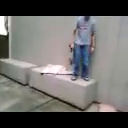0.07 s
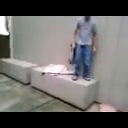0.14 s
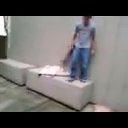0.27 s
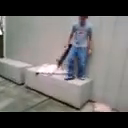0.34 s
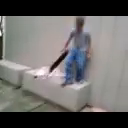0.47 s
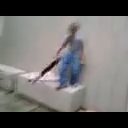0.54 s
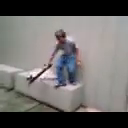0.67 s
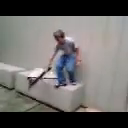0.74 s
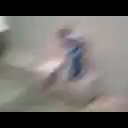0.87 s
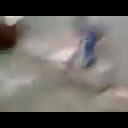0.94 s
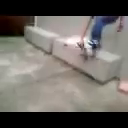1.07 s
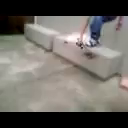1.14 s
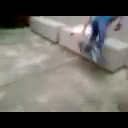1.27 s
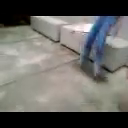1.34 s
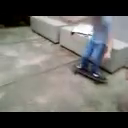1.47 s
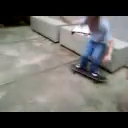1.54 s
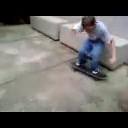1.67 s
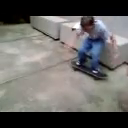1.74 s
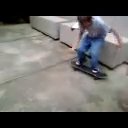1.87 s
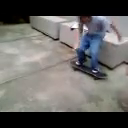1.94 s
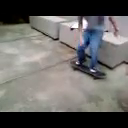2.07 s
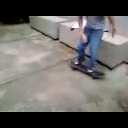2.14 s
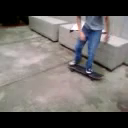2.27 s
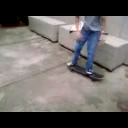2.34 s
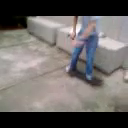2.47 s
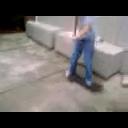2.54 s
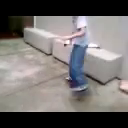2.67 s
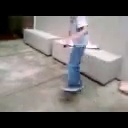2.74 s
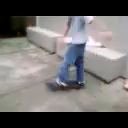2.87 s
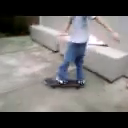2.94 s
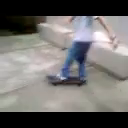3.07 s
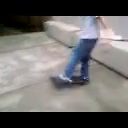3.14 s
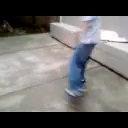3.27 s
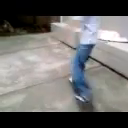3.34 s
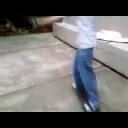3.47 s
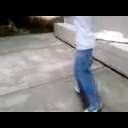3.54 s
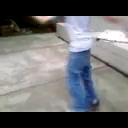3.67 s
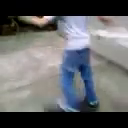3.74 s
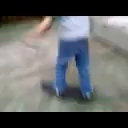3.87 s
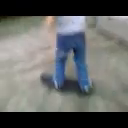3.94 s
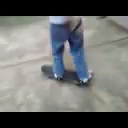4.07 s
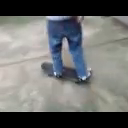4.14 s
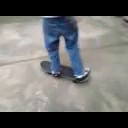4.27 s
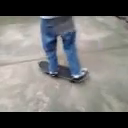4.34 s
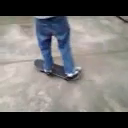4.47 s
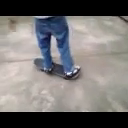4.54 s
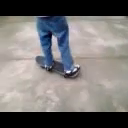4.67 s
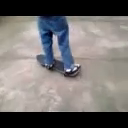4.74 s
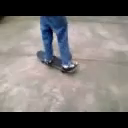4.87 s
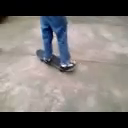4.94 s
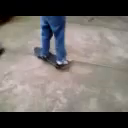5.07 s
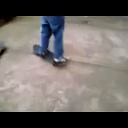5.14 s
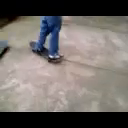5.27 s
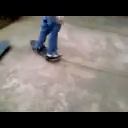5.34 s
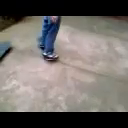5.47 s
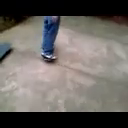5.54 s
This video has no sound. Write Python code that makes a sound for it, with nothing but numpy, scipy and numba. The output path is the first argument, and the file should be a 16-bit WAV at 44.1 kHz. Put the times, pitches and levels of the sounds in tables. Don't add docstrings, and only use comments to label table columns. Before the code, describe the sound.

In a walled concrete yard, a skateboard makes barely any noise at first, then lands with a loud, overloaded wooden and metallic crash. Wheels squeak sideways and the deck taps and rattles, before two separate hard clacks as the board slaps the ground. Faint rolling and scuffs follow. An old phone microphone gives narrow, gritty, clipped sound with short wall echoes.

```python
import sys
import numpy as np
from scipy import signal
from scipy.fft import rfft, irfft, next_fast_len
from scipy.io import wavfile
from scipy.ndimage import uniform_filter1d
from numba import njit

SR = 44100
rng = np.random.default_rng(int(sys.argv[2]) if len(sys.argv) > 2 else 0)


def magnitude_from_level(level_db):
    exponent = np.asarray(level_db, float) / 20
    return 10 ** exponent


def wav_record(signal):
    frames = np.transpose(np.atleast_2d(signal))
    bounded = np.clip(frames, -1, 1)
    quanta = np.round(bounded * 32767).astype(np.int16)
    wavfile.write(sys.argv[1], SR, quanta)


N = 247370

# [f/Hz, width/Hz, level/dB]
DECK = [(331, 180, 4), (424, 270, 1), (542.3, 180, -1), (661, 41, -1.5), (835, 33, -9.5)]
WHEELS = [(948, 280, -0.25), (1160, 160, -0.7), (1360, 160, 0.52), (1500, 74, -3.8), (1762, 480, -2.3)]
TRUCKS = [(2332, 340, -7), (2500, 210, -3.5), (2730, 300, -6.5), (3324, 660, -3), (3744, 580, -1.5)]
FREE_BOARD = (DECK, WHEELS, TRUCKS)
# [t/s of the crest, crest/full scale, struck part 0 deck 1 wheel 2 truck, ring f/Hz]
HARD_CLACKS = [
    (3.3172, .775, .4, 380),
    (4.2716, .9, .7, 550),
]
# [f/Hz, level/dB]
PHONE = [(20, 0), (120, -2), (250, -2), (3200, -1), (3600, -12.5), (3900, -18), (4250, -25.5),
         (4550, -48.5), (4900, -90.5)]


def to_rms(x, db):
    return x * magnitude_from_level(db) / np.sqrt(np.mean(x ** 2))


def ring(x, modes, scatter_db=np.zeros(5)):
    out = 0
    for k, (hz, width_hz, db) in enumerate(modes):
        r = np.exp(-np.pi * width_hz / SR)
        poles = [1, -2 * r * np.cos(2 * np.pi * hz / SR), r * r]
        mode = (1 - r) * signal.lfilter([1, 0, -1], poles, x)
        out = out + (-1) ** k * magnitude_from_level(db + scatter_db[k]) * mode
    return out


def colour(x, points):
    hz, db = np.transpose(points)
    size = next_fast_len(N + 8192)
    log_hz = np.log(np.fft.rfftfreq(size, 1 / SR) + 1)
    gain = magnitude_from_level(np.interp(log_hz, np.log(hz), db))
    return irfft(rfft(x, size) * gain, size)[..., :N]


def walk(rate_hz):
    k = int(SR / rate_hz)
    steps = np.repeat(rng.standard_normal(N // k + 1), k)
    return 1.9 * uniform_filter1d(uniform_filter1d(steps, k), k)[:N]


def held(start_s, length_s, db):
    attack_s, release_db_per_s = 0.008, 431
    t = np.arange(N) / SR - start_s
    return np.clip(t / attack_s, 0, 1) * magnitude_from_level(db - release_db_per_s * np.maximum(t - length_s, 0))


def grit(scatter_db):
    sizes = np.repeat(rng.exponential(size=N // 40 + 1), 40)[:N]
    return rng.standard_normal(N) * magnitude_from_level(scatter_db * sizes)


def blows(table, parts, ms=3., boost_db=0, peak=None):
    spill_db, spill_per_db = 3.5, 0.4
    out, t = np.zeros(N + 4096), np.arange(4096) / SR
    for s, struck_db, where, main_hz, *own_ms in table:
        decay_ms = own_ms[0] if own_ms else ms
        envelope = np.exp(-t * 1000 / decay_ms) * (1 - np.exp(-t / 0.00065))
        chatter = rng.standard_normal(len(t)) * envelope
        blow = 0
        for k, part in enumerate(parts):
            db = struck_db - abs(k - where) * max(spill_db - spill_per_db * struck_db, 0)
            in_reach = 0.85 * part[0][0] < main_hz < 1.2 * part[-1][0]
            spot = (main_hz, 35 + 0.04 * main_hz, 10.5 if in_reach else -np.inf)
            sound = ring(chatter, part + [spot], 2.5 * rng.standard_normal(len(part) + 1))
            blow = blow + sound / np.abs(sound).max() * magnitude_from_level(db + boost_db)
        start = int(s * SR)
        if peak:
            start -= np.abs(blow).argmax()
            blow = blow * peak / np.abs(blow).max()
        out[start:start + len(t)] += blow
    return out[:N]


def yard():
    # [f/Hz, level/dB per Hz]
    air_tone = [(15, -54), (25, -14.5), (146, -12.5), (286, -4), (357, -9.5), (504, -8.5), (581, -5.5),
                (1210, -7), (1970, -3), (2360, -13.5), (3200, -5.5), (4160, -35), (7040, -120)]
    hiss = colour(rng.standard_normal(N), air_tone[:-2])
    return to_rms(hiss, -50) * magnitude_from_level(0.33 * walk(2.3))


def rolling():
    # [t/s, wheel level/dB, weight on the deck/dB]
    effort = [(0.1, -51, -11), (0.45, -62, -5.5), (0.878, -57.5, -7.5), (1.25, -73, 4.5), (1.9, -33, -21),
              (2.24, -58, -9.5), (2.65, -56.5, -12), (2.944, -56, 1), (3.29, -57.5, -6.5),
              (3.42, -47, -6.5), (3.72, -50.5, 0), (3.775, -55, -5), (3.87, -41, -2), (4.19, -49, -0.5),
              (4.4, -46.5, -11), (4.82, -50.5, -3), (5.15, -58, 0.5), (5.61, -44.5, -2.5)]
    # [f/Hz, width/Hz, level/dB]
    deck_modes = [(313, 172, -1), (402.2, 89, 3.5), (518, 110, -2)]
    wheel_modes = [(1053, 230, 0.5), (1445, 410, 2.5), (1920, 620, 0)]
    # [t/s, length/s, level/dB]
    patches = [
        (2.722, 0.034, -42.5),
        (2.882, 0.03, -63),
        (3.561, 0.08, -51.5),
        (3.709, 0.027, -59.5),
        (3.983, 0.02, -35),
        (4.083, 0.12, -48.5),
        (4.835, 0.047, -51.5),
        (5.328, 0.085, -60),
    ]
    s, effort_db, weight_db = np.transpose(effort)
    t = np.arange(N) / SR
    wheel_db = np.interp(t, s, effort_db)
    load_db = np.interp(t, s, weight_db)
    deck = ring(grit(scatter_db=1.5) * magnitude_from_level(2.2 * walk(40)), deck_modes)
    wheels = ring(grit(scatter_db=1.5) * magnitude_from_level(2.2 * walk(50)), wheel_modes)
    shake = magnitude_from_level(wheel_db + load_db) + sum(held(*row) for row in patches)
    return shake * to_rms(deck, 0) + magnitude_from_level(wheel_db - 1.0) * to_rms(wheels, 0)


@njit
def sweep(x, hz, width_hz):
    y, band, low = np.empty(len(x)), 0., 0.
    for i in range(len(x)):
        g, k = np.tan(np.pi * hz[i] / SR), width_hz / hz[i]
        v = (band + g * (x[i] - low)) / (1 + g * (g + k))
        band, low, y[i] = 2 * v - band, low + 2 * g * v, k * v
    return y


def scrub():
    # [t/s, length/s, level/dB, squeal f/Hz]
    skids = [(1.42, 0.39, -57, 2170), (1.57, 0.038, -53, 1806), (1.712, .045, -43.5, 2152),
             (1.917, .04, -40.5, 2873), (1.975, 0.077, -35.5, 2510), (2.152, 0.014, -43.5, 2295),
             (2.483, 0.052, -50, 2046), (2.561, .07, -55.5, 2726), (2.686, .07, -59.5, 2410),
             (2.733, 0.014, -46, 2500), (2.962, 0.03, -54, 2326), (3.057, 0.049, -51.5, 2620),
             (3.103, 0.067, -32, 2560), (3.182, .05, -37.5, 2866), (3.388, 0.084, -58, 2510),
             (3.914, 0.082, -42.5, 2740), (4.042, 0.049, -45.5, 2490), (4.112, 0.052, -53, 2200),
             (4.319, 0.056, -47, 3110), (4.438, 0.059, -40.5, 2700), (4.522, 0.2, -50.5, 3000),
             (5.098, 0.23, -68.5, 2970), (5.484, 0.01, -56, 2530), (5.513, 0.03, -40.5, 2560),
             (5.585, .04, -41, 2620)]
    creep_db, creep_hz, glide_hz_per_s = -68, 2800, 840
    t, gain = np.arange(N) / SR, magnitude_from_level(creep_db + 1.5 * walk(6))
    pull = gain * creep_hz
    for start_s, length_s, db, hz in skids:
        drag = held(start_s, length_s, db)
        from_middle_s = np.clip(t - start_s - length_s / 2, -0.1, 0.1)
        gain = gain + drag
        pull = pull + drag * (hz + glide_hz_per_s * from_middle_s)
    centre_hz = pull / gain
    slips = grit(scatter_db=1.2) * magnitude_from_level(2.2 * walk(200))
    squeal = sweep(sweep(ring(slips, TRUCKS), centre_hz, 710.0), centre_hz, 710.0)
    strength = np.sqrt(uniform_filter1d(squeal ** 2, 900))
    return magnitude_from_level(1.0) * gain * squeal / strength


def taps():
    # [t/s, level/dB, struck part 0 deck 1 wheel 2 truck, ring f/Hz]
    knocks = [(0.128, -29.5, 0.56, 413), (0.88, -39, 0.38, 437), (1.556, -45, 0.97, 1280),
              (1.563, -23.5, 1.5, 1357), (1.58, -26.5, 1.23, 1890), (1.626, -28.5, 1.46, 2400),
              (1.642, -30.5, 1.7, 2320), (2.503, -28.5, 1.2, 2107), (2.521, -28.5, 0.6, 555),
              (2.528, -21.5, 0.52, 575), (2.533, -28.5, 1.12, 1000), (2.565, -34.5, 0.202, 560),
              (2.722, -31, 0.14, 485), (2.741, -27.5, 0.2, 302), (2.752, -24, 2.04, 2260),
              (2.873, -37.5, .8, 1720), (2.929, -31.5, 1.4, 1168), (3.72, -45, 0.13, 321.2),
              (3.924, -29, 1.72, 3120), (4.601, -35, 1.7, 2270), (4.638, -26, 1.6, 3200),
              (4.774, -28, 1.47, 1400), (4.797, -35.5, 1.33, 1370), (4.833, -27.5, 1.5, 1300),
              (5.286, -44, 0.82, 393), (5.378, -33.5, 0.66, 550), (5.522, -27.5, 1.86, 2490),
              (5.578, -22.5, 1.7, 1430), (3.96, -37, 1, 1820), (3.988, -31, 1, 1780)]
    return blows(knocks, FREE_BOARD, ms=3.3)


def rattles():
    # [t/s, level/dB, ring f/Hz]
    loose = [(1.335, -41.5, 1670), (2.144, -36, 2250), (2.164, -31.5, 2390), (2.548, -30, 2050),
             (2.581, -32, 2590), (2.623, -35, 2610), (2.959, -40.5, 2490), (3.459, -35, 2800),
             (4.535, -35.5, 3240), (4.549, -31, 2450), (4.56, -39, 3120), (4.601, -29.5, 3210),
             (4.682, -30, 2440), (4.697, -26.5, 2440), (4.71, -29, 2390), (4.825, -38, 1990),
             (5.189, -38.5, 3030), (5.49, -31.5, 2730), (5.5, -34, 2410), (5.539, -29, 2440),
             (5.563, -26.5, 2470), (5.597, -35, 2470), (4.57, -38.5, 2400), (4.578, -37, 2500),
             (4.589, -28, 2370), (3.787, -19, 3130)]
    return blows([(s, db, 2, hz) for s, db, hz in loose], FREE_BOARD, ms=2.55)


def slam():
    # [t/s, level/dB, struck part 0 deck 1 wheel 2 truck, ring f/Hz, chatter/ms]
    landing = [(1.693, -12, 1.5, 1166, 4.6), (1.736, -23.5, 1, 1150, 8.6), (1.758, -9, 1.44, 2250, 5.8),
               (1.761, -6, 0.9, 341, 10), (1.77, -2.5, 1.55, 2640, 7.2), (1.78, -4.5, 1.8, 2426, 6.2),
               (1.788, -3.1, 1.1, 2373, 4.2), (1.805, -8.5, 1, 757, 5), (1.814, -4.5, 0.42, 879, 10),
               (1.826, -12.5, .8, 560, 14), (1.853, -10.5, 1.1, 650, 8.8), (1.873, -6.5, 0.8, 501, 4.5),
               (1.881, -9.5, .4, 545, 3.3), (1.909, -14, 0.65, 1480, 3)]
    impact = blows(landing[3:7], FREE_BOARD, boost_db=8.5)
    return blows(landing[:3], FREE_BOARD) + impact + blows(landing[7:], FREE_BOARD)


def shudder():
    # [f/Hz, width/Hz, level/dB]
    plies = [(560, 75, 2.5), (660, 80, 3.5), (800, 170, -1), (930, 120, -5.5)]
    start_s, decay_db_per_s = 1.83, 98.5
    t = np.arange(N) / SR - start_s
    flex = ring(grit(scatter_db=-1.0) * magnitude_from_level(3 * walk(40)), plies)
    return to_rms(flex, -25.5) * np.clip(t / 0.02, 0, 1) * magnitude_from_level(-decay_db_per_s * np.maximum(t, 0))


def clacks():
    # [f/Hz, width/Hz, level/dB]
    loaded_deck = [(313.3, 140, -4.5), (377, 160, -2.5), (560, 120, -3.5)]
    # [t/s, level/dB, struck part, ring f/Hz]
    first_wheels = [
        (3.3045, -11, 1.3, 2700),
        (4.2628, -11, .8, 550),
        (4.2665, -9, 1.8, 2450),
    ]
    # [t/s, level/dB, struck part, ring f/Hz]
    bounces = [(3.312, -6, 2.48, 2730), (3.327, -13.5, 1.02, 403), (3.336, -23.5, .2, 392),
               (3.346, -17.5, 0.52, 588), (3.36, -27, .4, 563), (3.371, -26.5, 1, 1360),
               (3.781, -11, 0.42, 402), (3.784, -12, 0.64, 1155), (3.797, -18, 0.51, 387),
               (3.821, -18, 0.52, 550), (3.831, -31, 1.3, 1300), (4.28, -14.5, 1.65, 2588),
               (4.284, -23, 0.99, 323), (4.292, -16.5, .4, 1540), (4.301, -21, 0.42, 560),
               (4.308, -17.5, 0.45, 560), (4.315, -26, 0.091, 518)]
    loaded_board = (loaded_deck, [(867, 92, -5)] + WHEELS[1:], TRUCKS)
    crest_ms = 2.0
    hard = 0
    for s, peak, where, hz in HARD_CLACKS:
        hard = hard + blows([(s, -6, where, hz)], loaded_board, crest_ms, peak=peak)
    first = blows(first_wheels, loaded_board, crest_ms)
    return hard + first + blows(bounces, loaded_board, ms=4.8, boost_db=4.5)


@njit
def walls(x, lags, gain, damp):
    line, soft, out = np.zeros((8, 4096)), np.zeros(8), np.zeros(len(x))
    for i in range(len(x)):
        total = 0.
        for k in range(8):
            soft[k] += (1 - damp) * (gain[k] * line[k, (i - lags[k]) & 4095] - soft[k])
            total += soft[k]
            out[i] += soft[k] * (1 - 2 * (k % 2))
        for k in range(8):
            line[k, i & 4095] = x[i] + soft[k] - total / 4
    return out


def echo(board):
    t60_s = 0.32
    lags = np.array([613, 829, 1051, 1327, 1601, 1913, 2251, 2617])
    return magnitude_from_level(-17) * walls(board, lags, magnitude_from_level(-60 * lags / SR / t60_s), 0.14)


def crests(air):
    t, heard = np.arange(N) / SR, np.abs(colour(air, PHONE))
    for s, peak, *_ in HARD_CLACKS:
        lift = peak / heard[abs(t - s) < 0.004].max()
        air = air * (1 + (lift - 1) * np.exp(-((t - s) / 0.008) ** 4))
    return air


def scene():
    board = rolling() + scrub() + taps() + rattles() + slam() + shudder() + clacks()
    return crests(yard() + board + echo(board))[None]


def band_limit(x):
    return signal.sosfilt(signal.butter(12, 16470, fs=SR, output="sos"), x)


def record(dry):
    clip = 0.735
    loudness = np.sqrt(uniform_filter1d(dry ** 2, 400) + 1e-12)
    grain = magnitude_from_level(-15) * loudness * rng.standard_normal(dry.shape)
    x = np.clip(colour(dry + grain, PHONE), -clip, clip)
    x = x * np.clip(np.arange(N, 0, -1) / 90, 0, 1)
    hiss = magnitude_from_level(-101) * rng.standard_normal(x.shape)
    return band_limit(x + hiss)


dry = scene()
out = record(dry)
wav_record(out)
```